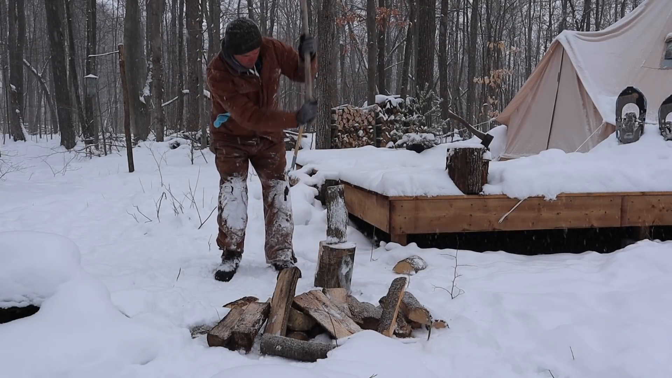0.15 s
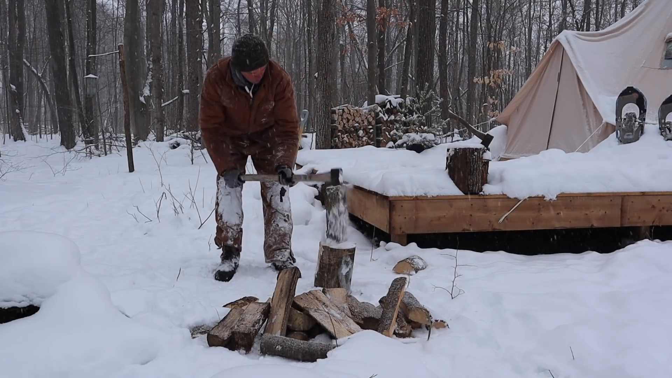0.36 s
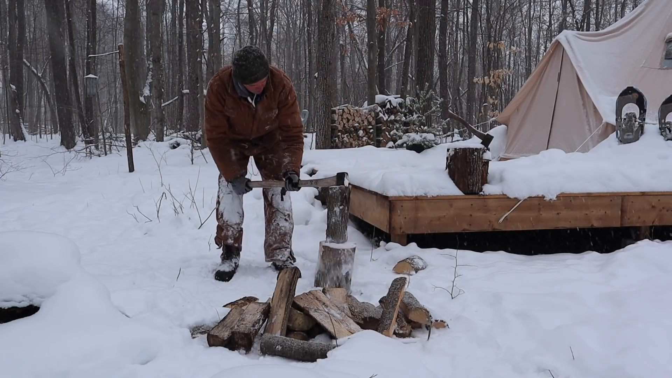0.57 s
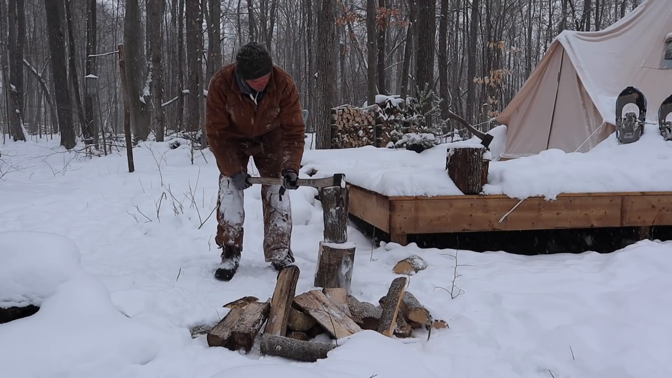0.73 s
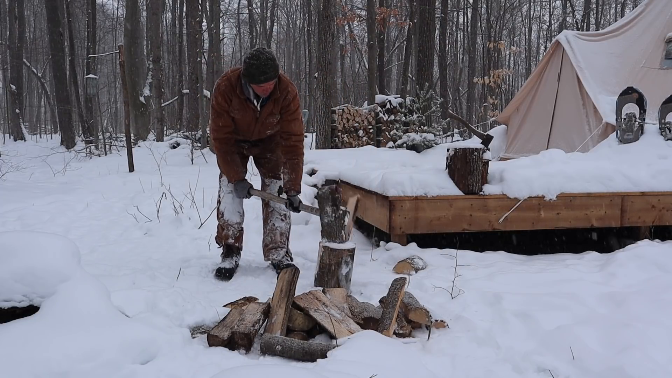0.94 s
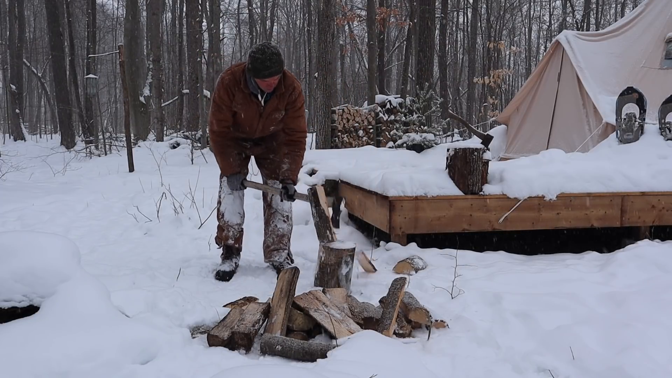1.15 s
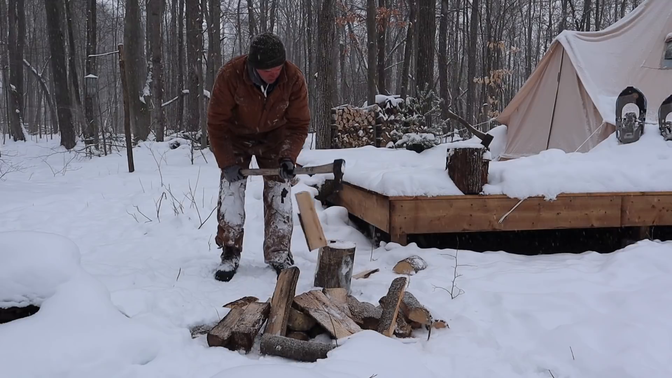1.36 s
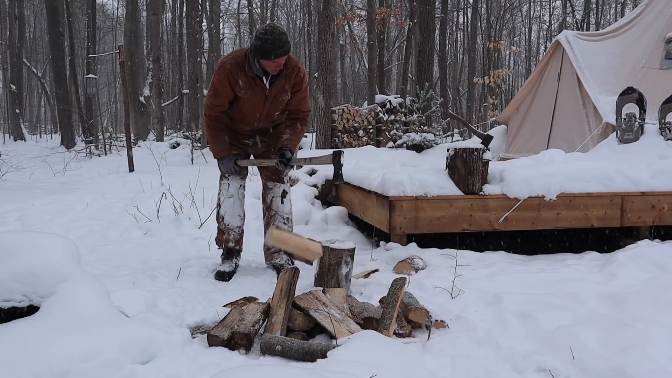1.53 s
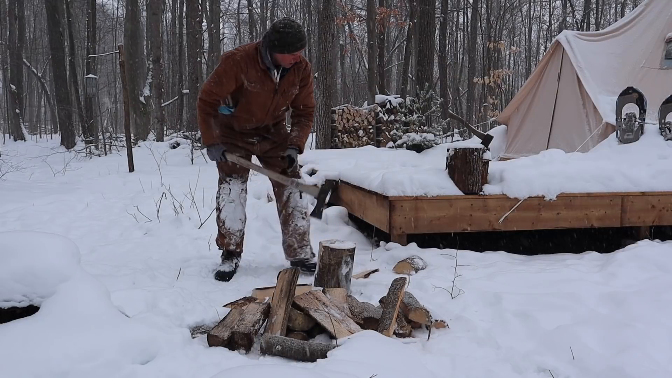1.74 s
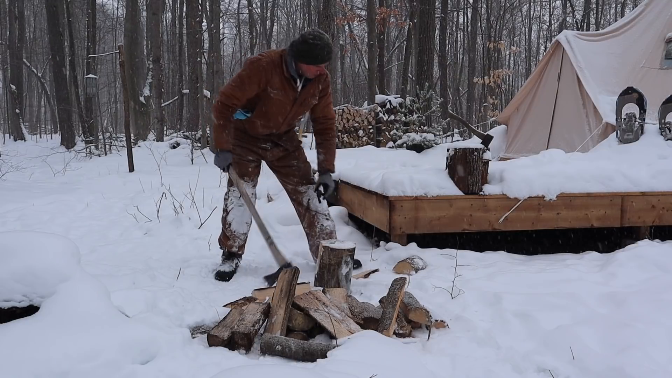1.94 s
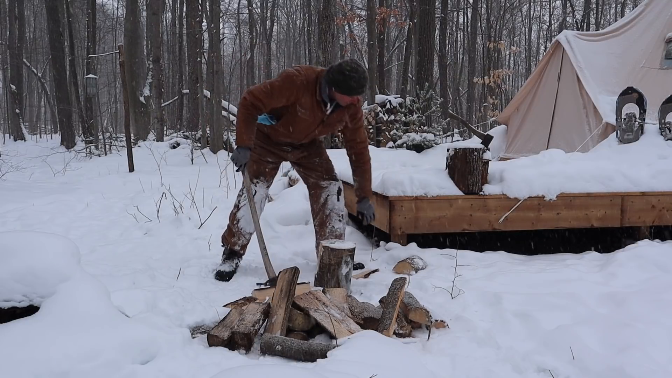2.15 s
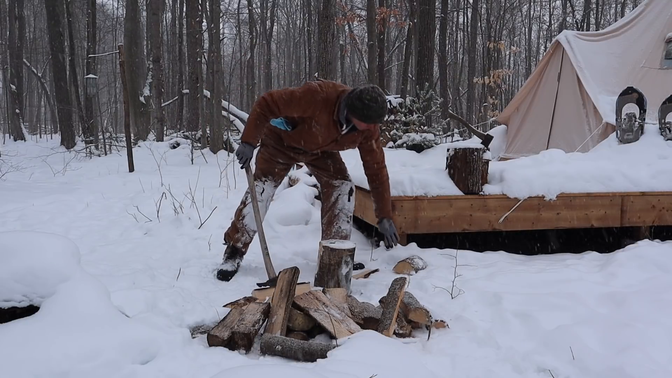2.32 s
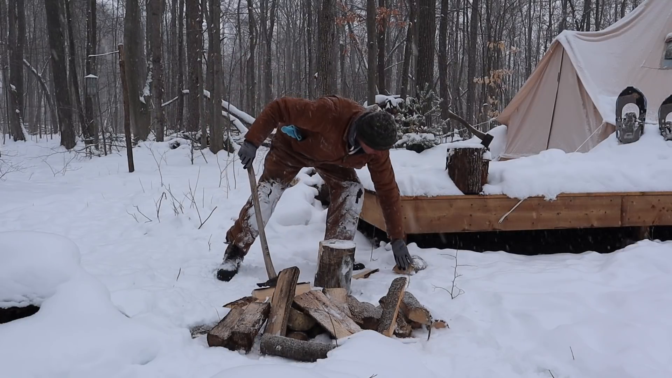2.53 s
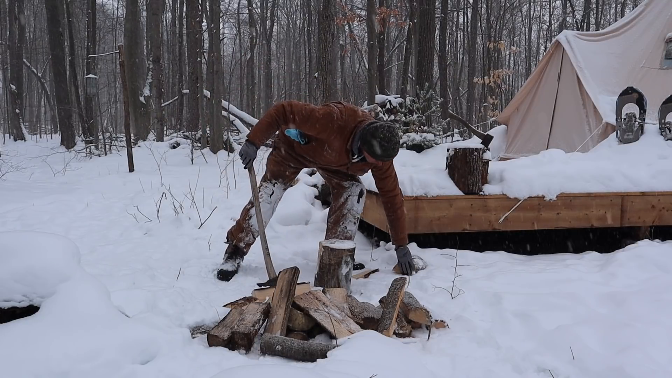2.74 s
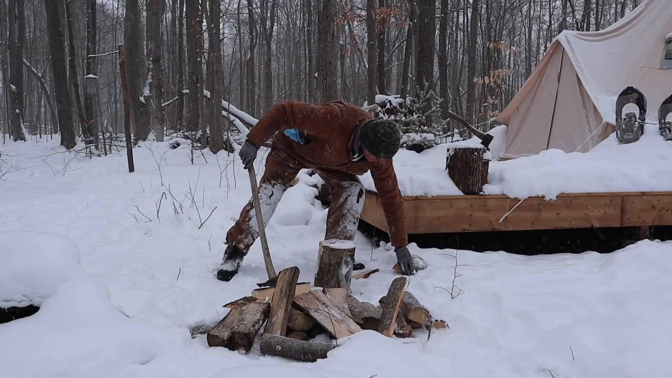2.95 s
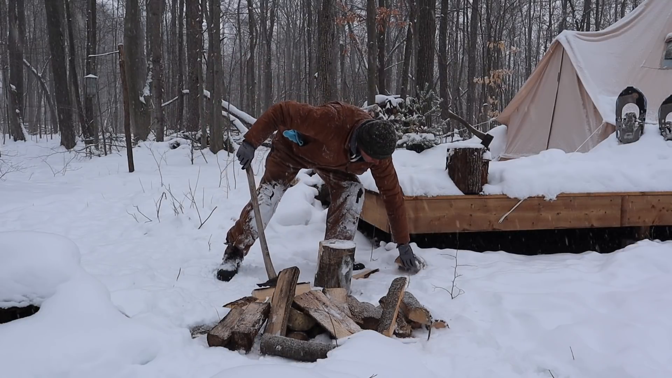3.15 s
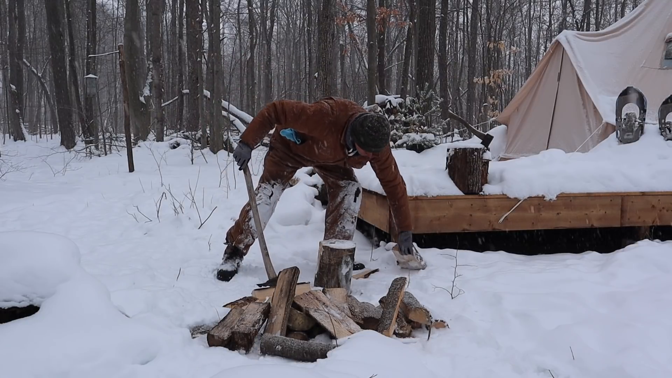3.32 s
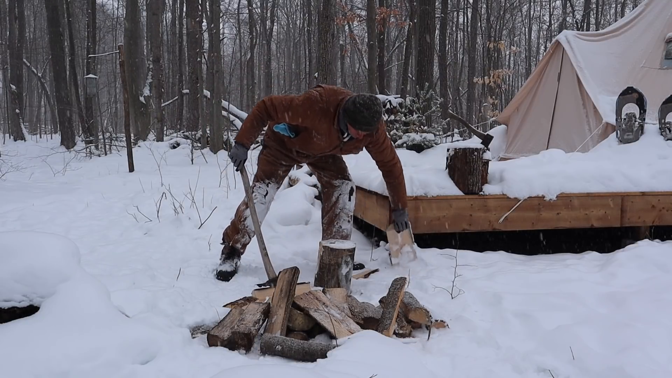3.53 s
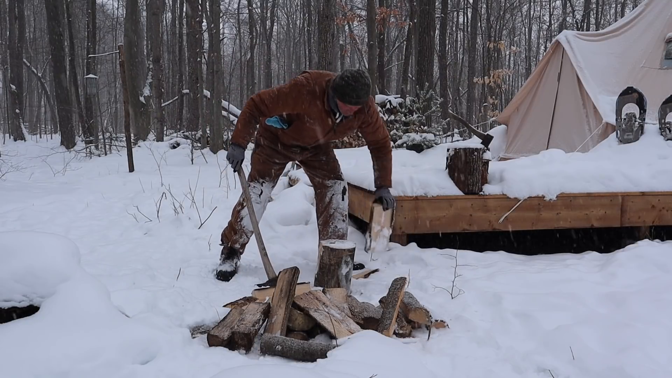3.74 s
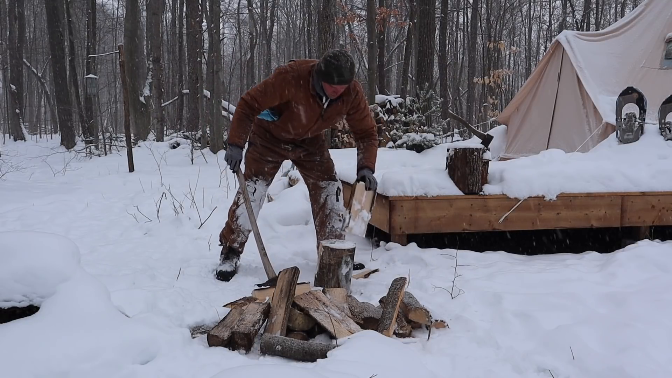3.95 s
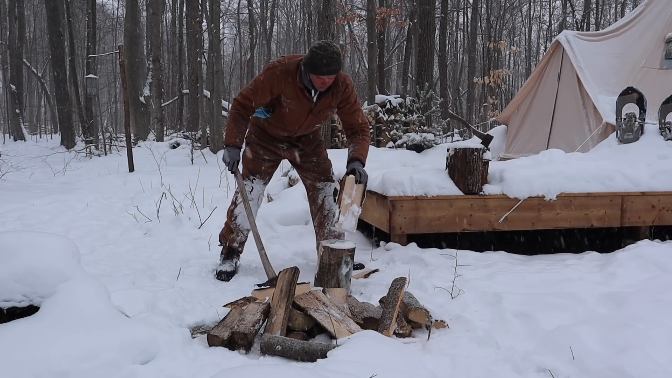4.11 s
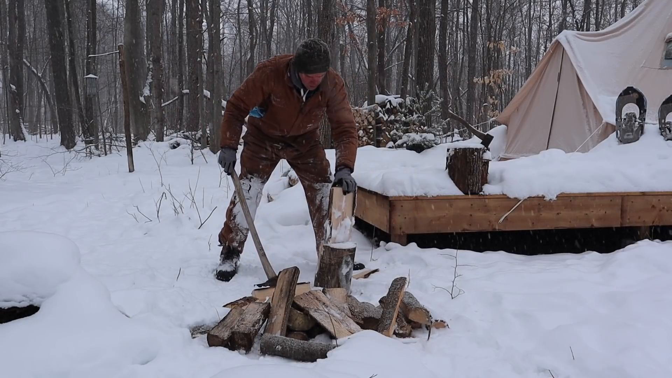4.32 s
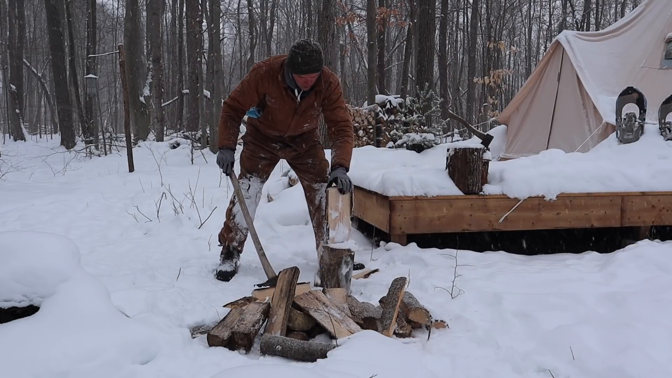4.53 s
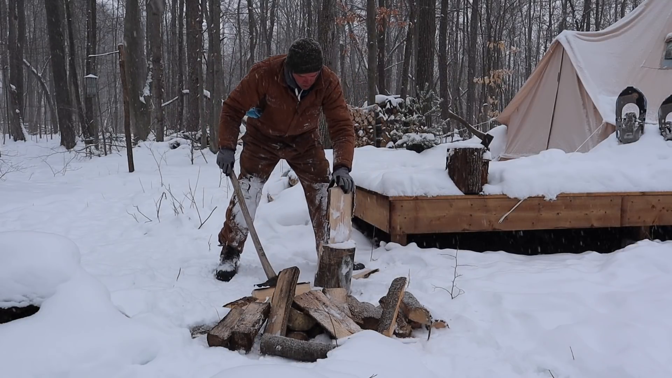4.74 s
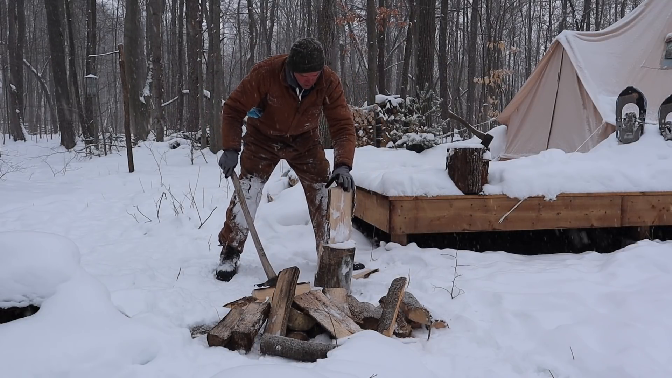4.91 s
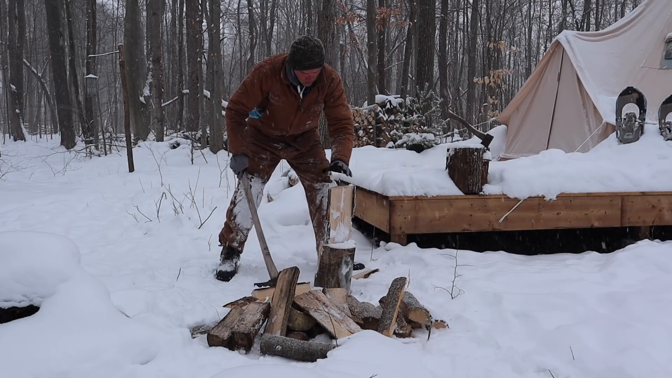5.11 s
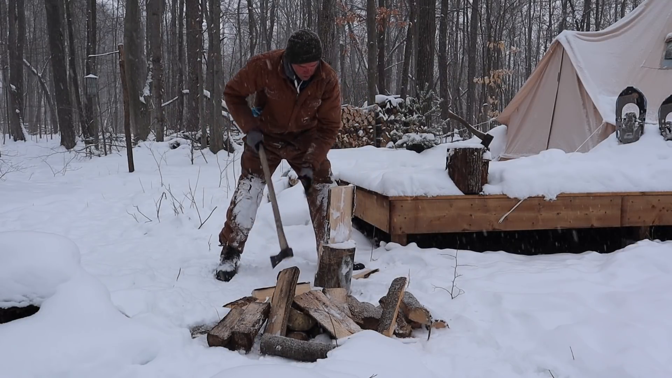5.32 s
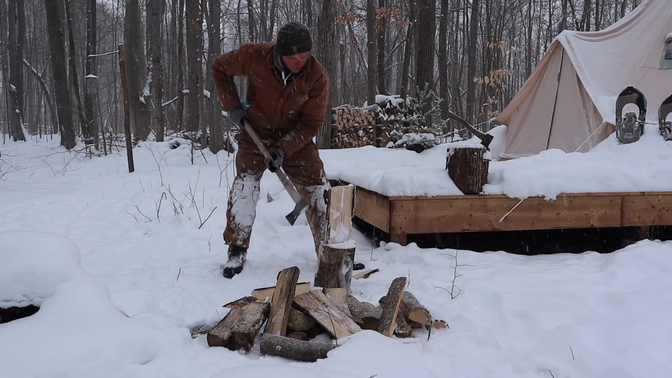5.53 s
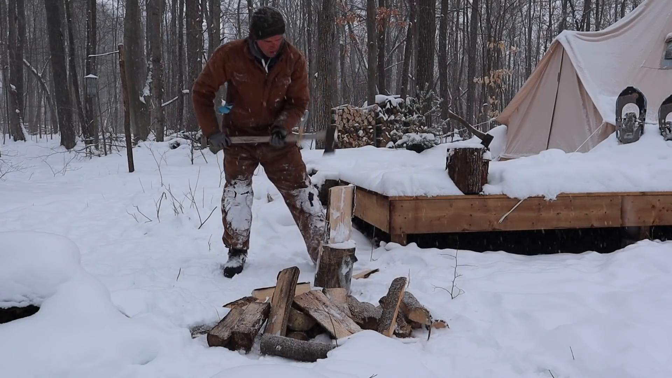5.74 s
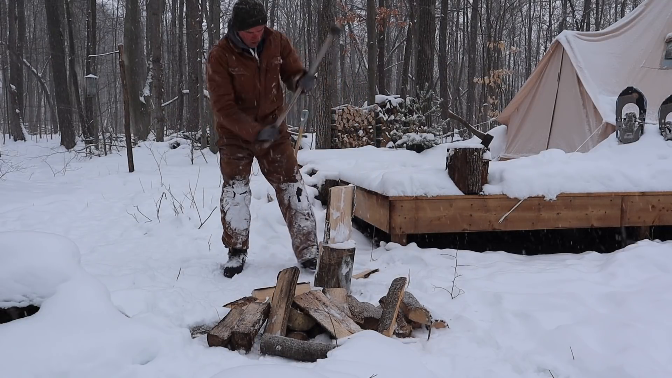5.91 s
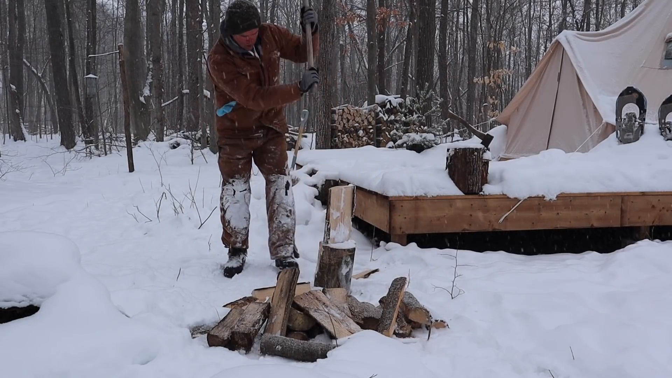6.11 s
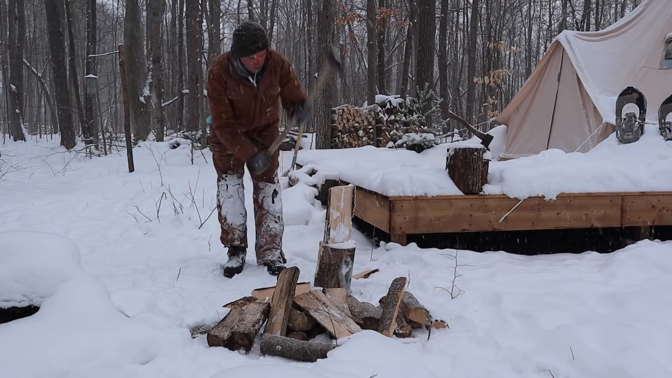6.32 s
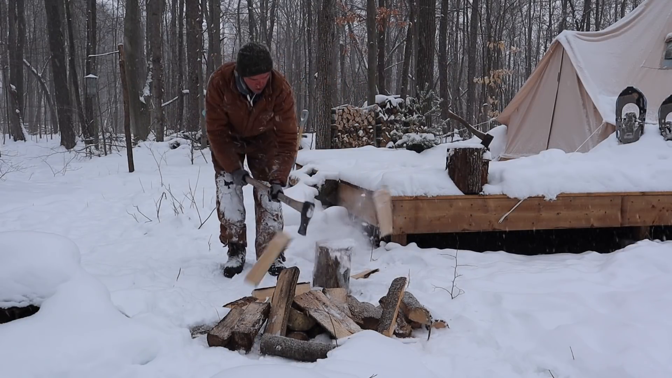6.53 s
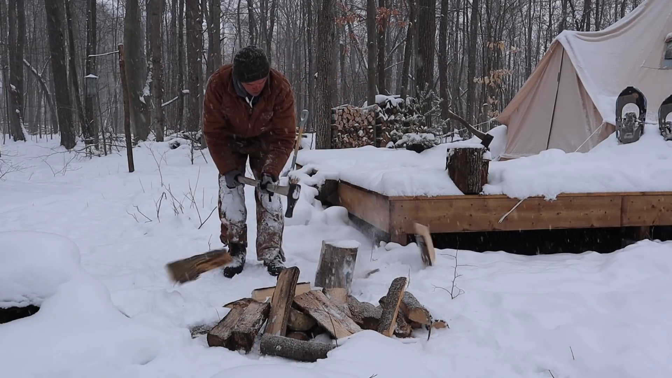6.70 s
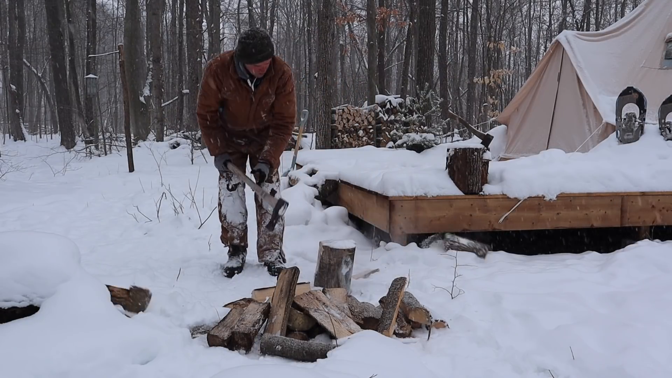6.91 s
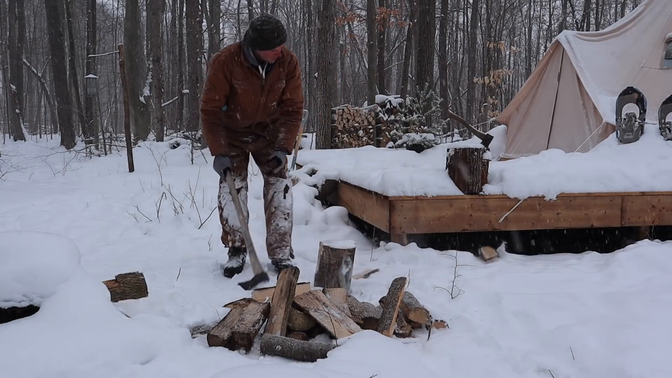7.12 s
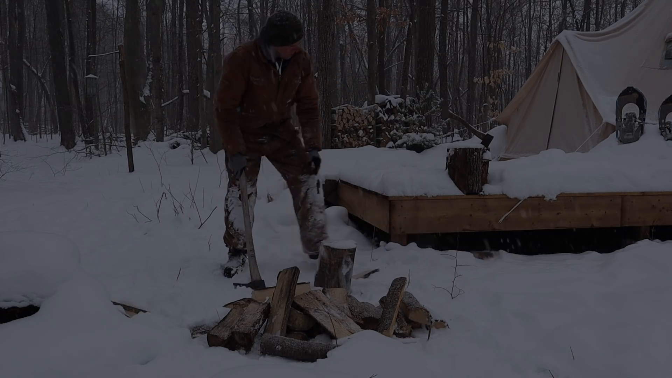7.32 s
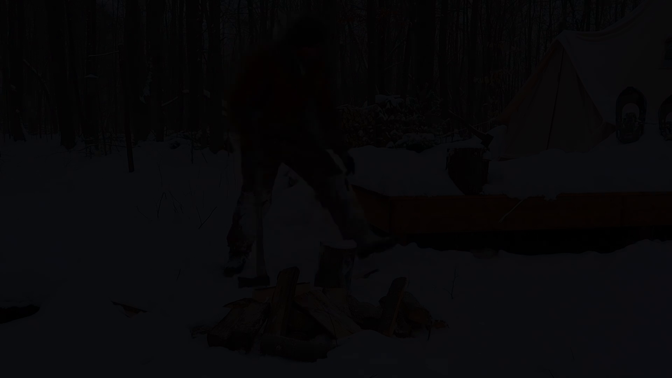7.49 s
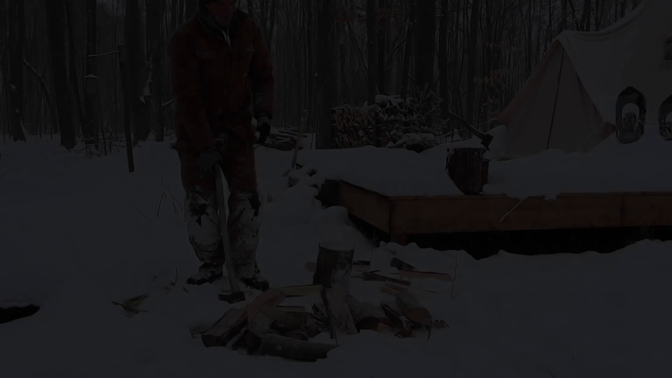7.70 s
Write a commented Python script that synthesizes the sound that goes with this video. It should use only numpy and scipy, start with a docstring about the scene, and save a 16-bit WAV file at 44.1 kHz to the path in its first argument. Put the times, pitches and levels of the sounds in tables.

```python
"""An axe splits a log on a chopping block in a snowy wood, a few metres from the microphone.
Wind and hiss, a random field, lie under granular rustle of clothes and snow; a bite of breaking fibres
comes early and its late echo returns from the trunks. Fibre snaps tear the log apart; pieces knock, as
ringing modes, on block, deck and pile. Thin rising chirps, steely rubs and faint high whines come and go;
after a quieter stretch a second blow brings a run of hard knocks, and the last pieces settle."""
import sys
import numpy as np
from scipy import signal
from scipy.io import wavfile
from scipy.ndimage import uniform_filter1d

SR = 44100
rng = np.random.default_rng(int(sys.argv[2]) if len(sys.argv) > 2 else 0)


def store_wav(level_fs):
    """Save 16-bit WAV to argv[1]."""
    pcm = np.round(np.clip(np.atleast_2d(level_fs), -1, 1) * 32767)
    wavfile.write(sys.argv[1], SR, pcm.T.astype(np.int16))


N = 346626
FIFTH = np.arange(SR // 5) / SR  # a fifth of a second [s], long enough for any knock

# a struck billet: (multiple of its pitch, level [dB], share of its t60)
BILLET = [(.33, -9, 0.68), (.62, -7, 0.68), (0.999, 1, 1), (1.241, -12.5, .6), (1.42, -6.5, .7),
          (1.851, -8, .6), (2.4, -10, .6), (2.95, -19.5, .5)]
# deck, pile and large pieces: (multiple of the hollow pitch, level [dB], t60 before the ring factor [s])
HOLLOW = [(.75, -6, 0.049), (1, -7, 0.083), (1.2, -8, .06), (1.47, -6.5, .05), (1.85, -8, .05),
          (2.1, -9.5, .05)]
# the block on frozen soil: (frequency [Hz], level [dB], t60 before any shortening [s])
BLOCK = [(78, 3.5, .08), (104.6, 8.5, 0.12), (140, 2, .045)]
# fibres breaking: (frequency [Hz], level [dB])
SNAP = [(1470, -32.5), (2500, -7.5), (3710, -2.5), (5770, -7.5), (7980, -5), (9050, -15), (14400, -18.5),
        (15900, -23), (16500, -42)]


def gain_of(db):
    """Decibels to gain."""
    return 10 ** (np.asarray(db) / 20)


def evened(x):
    """Scales to rms 1."""
    return x / np.sqrt(np.mean(x ** 2) + 1e-20)


def peaked(x):
    """Scales to peak 1."""
    return x / (abs(x).max() + 1e-20)


def read(points, hz):
    """Straight lines on a log-frequency axis."""
    f, value = np.transpose(points)
    return np.interp(np.log(hz + 1), np.log(f + 1), value)


def add(mix, s, sound):
    """Mixes a sound in at second s."""
    part = mix[round(s * SR):][:len(sound)]
    part += sound[:len(part)]


def above(x, hz):
    """High-pass."""
    return signal.sosfilt(signal.butter(2, hz, "high", fs=SR, output="sos"), x)


def causal(points):
    """Minimum-phase response with the given spectrum, floored at -90 dB."""
    level_db = read(points, abs(np.fft.fftfreq(4096, 1 / SR)))
    log_gain = np.log(gain_of(np.maximum(level_db, -90)))
    return np.fft.ifft(np.exp(np.conj(signal.hilbert(log_gain)))).real[:1024]


def ring(modes, pitch=1, lasting=1):
    """Sum of dying sines; pitch scales their frequencies, lasting their t60s."""
    sound = np.zeros(len(FIFTH))
    for f, db, t60 in modes:
        decay = gain_of(db - 60 * FIFTH / (t60 * lasting))
        sound += decay * np.sin(2 * np.pi * f * pitch * FIFTH)
    return sound


def singing(peaks):
    """Response of resonances given by their widths: the narrower, the longer they ring."""
    return ring([(f, db + 10 * np.log10(width), 2.2 / width) for f, width, db in peaks])


def grains(count, per_s, spread_db):
    """Sparse clicks of random sign, a few of them large."""
    chance, size = rng.random(count), rng.exponential(1, count)
    sign = rng.choice([-1., 1.], count)
    return (chance < per_s / SR) * sign * gain_of(spread_db * np.minimum(size, 4))


def coloured(x, response):
    """Filters x and brings it to rms 1."""
    return evened(signal.oaconvolve(x, response)[:len(x)])


def swell(top, rise, fall, hold=0):
    """Times around a top, and a level in dB that climbs to it, holds and falls in straight lines."""
    t = top + np.arange(-SR // 4, SR // 3) / SR
    t = t[t >= 0]
    return t, -20 * np.maximum((top - t) / rise, np.maximum(t - top - hold, 0) / fall)


def chatter(contact):
    """A contact force: a first touch followed by smaller, uneven ones."""
    touches = grains(len(FIFTH), 8200, 2.7) + 4 * (FIFTH == 0)
    return touches * np.exp(-FIFTH / max(contact, 2e-4))


def rung(db, force, body):
    """A force through a body, at a given peak level."""
    return gain_of(db) * peaked(signal.fftconvolve(force, body)[:len(force)])


def air():
    """Wind in bare trees and microphone hiss: random short-time spectra with faint drifting patches."""
    # wind and hiss: (frequency [Hz], level [dB])
    air_colour = [(12, -44.5), (20, -18.5), (65, -3), (195, -7), (224, -5.5), (289, -7.5), (382, -4.5),
                  (440, -14), (521, -10), (816, -13.5), (1280, -15.5), (15200, -24.5), (16500, -33.5)]
    # slow changes: (time [s], level [dB])
    air_level = [(0, 1), (2, 2), (3, -0.1), (5, 0.4), (6.4, 1.7), (7.1, 2.1), (7.45, -2.5), (7.7, -4.5),
                 (7.86, -5.5)]
    air_db = -56.5  # rms before the slow changes
    frames, hz = N // 256 + 5, np.fft.rfftfreq(1024, 1 / SR)
    a, b, patches = rng.standard_normal((frames, 513, 3)).T
    patches = uniform_filter1d(patches, 12, 0)  # across frequency
    patches = evened(uniform_filter1d(patches, 14, 1))  # along time
    spectra = (a + 1j * b) * gain_of(read(air_colour, hz)[:, None] + .8 * patches)
    noise = evened(signal.istft(spectra, nperseg=1024, noverlap=768)[1][:N])
    level_db = np.interp(np.arange(N) / SR, *np.transpose(air_level))
    return gain_of(air_db + level_db) * noise


def move():
    """Cloth swishes in soft grains, snow crunches in finer, sharper ones, over a low, wandering fidget."""
    # sleeves, boots and snow as the chopper moves: (peak time [s], rise [s per 20 dB],
    # fall [s per 20 dB], swish level [dB], crunch level [dB])
    moves = [(.002, .011, .05, -38, -43), (.146, .14, .07, -46, -56), (.338, .1, .021, -51, -62),
             (.41, .03, .011, -43, -56), (1.042, .011, .09, -41, -46), (1.125, .021, .05, -52, -60),
             (1.24, .03, .07, -52, -54), (1.37, .05, .15, -60, -66), (1.602, .015, .05, -54, -64),
             (1.75, .15, .15, -58, -56), (1.95, .15, .11, -60, -59), (2.09, .05, .09, -50, -48),
             (2.21, .015, .05, -55, -62), (2.41, .09, .09, -60, -66), (3.26, .11, .04, -64, -63),
             (3.46, .2, .15, -64, -54), (3.925, .011, .03, -54, -68), (4.41, .021, .09, -52, -53),
             (5.08, .09, .05, -70, -60), (5.168, .03, .05, -60, -65), (5.374, .05, .06, -59, -57),
             (5.53, .05, .04, -54, -58), (5.6, .07, .03, -49, -49), (5.73, .06, .06, -49, -60),
             (5.91, .05, .05, -52, -60), (6.04, .13, .11, -45, -56), (6.16, .09, .13, -50, -60),
             (6.37, .021, .11, -52, -53), (6.66, .011, .15, -43, -52), (6.82, .021, .021, -40, -46),
             (6.99, .011, .15, -49, -58), (7.034, .021, .021, -61, -53), (7.15, .06, .06, -56, -59),
             (7.32, .04, .15, -57, -56), (7.61, .015, .05, -58, -58), (7.755, .03, .03, -47, -58)]
    # cloth: (frequency [Hz], level [dB])
    cloth_colour = [(71, -44.5), (120, -9), (366, -9.5), (430, -1), (491, -5.5), (936, -11), (1500, -13.5),
                    (4000, -25.5), (5200, -42), (8800, -120)]
    # snow: (frequency [Hz], level [dB])
    snow_colour = [(710, -29.5), (1200, -11), (2510, -8.5), (2790, -10), (5780, -10.5), (7570, -5),
                   (9720, -14), (12100, -18.5), (16000, -22)]
    fidget_swish_db, fidget_crunch_db, wander_db = -68, -71, 2.5
    wander = gain_of(wander_db * evened(uniform_filter1d(rng.standard_normal(N), 4000)))
    swish, crunch = gain_of(fidget_swish_db) * wander, gain_of(fidget_crunch_db) * wander
    for peak, rise, fall, swish_db, crunch_db in moves:
        t, shape_db = swell(peak, rise, fall)
        add(swish, t[0], gain_of(swish_db + shape_db))
        add(crunch, t[0], gain_of(crunch_db + shape_db))
    cloth = coloured(grains(N, 1500, 1.7), causal(cloth_colour))
    snow = coloured(grains(N, 4000, 2.6), causal(snow_colour))
    return swish * cloth + crunch * snow


def soil(db):
    """The frozen ground answers a shock with a slow, late boom."""
    return gain_of(db) * np.sin(np.pi * FIFTH / FIFTH[-1]) ** 2 * np.sin(2 * np.pi * 52 * FIFTH)


def hit(contact, knock_db, hz, t60_s, tilt_db, snap_db, hollow_db, hollow_hz, hollow_lasting, thud_db):
    """An uneven contact force rings the billet, the hollow under it and the block."""
    ground_db, ground_share = -42, .55  # the ground booms at ground_db plus this share of the thud's dB
    force = chatter(contact)
    push = np.exp(-((FIFTH - .0012) / 0.00056) ** 2)  # the slow part of the force moves the heavy bodies
    billet = [(k, db + tilt_db * np.log2(k), t60) for k, db, t60 in BILLET]
    sound = rung(knock_db, force, above(ring(billet, hz, t60_s), .25 * hz))
    sound += rung(snap_db, force, causal(SNAP))
    hollow = above(ring(HOLLOW, hollow_hz, hollow_lasting), 0.39 * hollow_hz)
    sound += rung(hollow_db, push + 0.027 * force, hollow)
    sound += rung(thud_db, push, above(ring(BLOCK), 55))
    return sound + soil(ground_db + ground_share * thud_db)


def blow(db, tilt_db, ground_db, contact, shock_db, log_db, log_hz, t60_s, thud_db):
    """A dense burst of breaking fibres while the edge travels, brightest at first touch."""
    # the edge parting the fibres: (frequency [Hz], level before the brightness tilt [dB])
    bite = [(88, -42.5), (150, -2.5), (409, -17), (1120, 0.5), (1790, -2), (2400, -15), (6050, -18),
            (7810, -19), (11100, -29), (14700, -23.5), (16500, -39.5)]
    colour = causal([(f, d + tilt_db * np.log2(f / 1000)) for f, d in bite])
    burst = coloured(grains(len(FIFTH), 15000, 3.14), colour)
    treble = above(burst, 3600)
    sound = (burst - treble) * np.exp(-(FIFTH / contact) ** 3)
    sound += treble * (np.exp(-(FIFTH / (.5 * contact)) ** 2) + 0.11 * np.exp(-FIFTH / 0.0035))
    log = rung(log_db, chatter(0.0018), above(ring(BILLET, log_hz, t60_s), 540))  # the log rings briefly
    log += gain_of(thud_db) * peaked(above(ring(BLOCK, 1, .45), 55))  # and drives the block
    shock = gain_of(shock_db) * peaked(colour)  # what goes out to the trunks
    return gain_of(db) * peaked(sound) + log + soil(ground_db), shock


def tear(t, body_db, fizz_db, hollow_db):
    """Clumped fibre snaps excite the log's body, its bright fizz and the hollow below."""
    # body of the tearing log: (frequency [Hz], width [Hz], level [dB])
    grain = [(760, 330, -4), (1270, 270, -2), (1800, 480, 1.5), (2300, 400, -9), (3050, 170, -4.5)]
    clumps = gain_of(2.6 * evened(uniform_filter1d(rng.standard_normal(len(t)), 120)))
    snaps = grains(len(t), 7000, 1.9) * clumps
    sound = coloured(snaps, above(singing(grain), 370))
    sound += gain_of(fizz_db) * coloured(snaps, causal(SNAP))
    sound += gain_of(hollow_db) * coloured(snaps, above(ring(HOLLOW, 420, 0.65), 200))
    soft_ends = np.minimum(1, np.minimum(t - t[0], t[-1] - t) / 0.0013)
    return t[0], gain_of(body_db) * sound * soft_ends


def after_blow(s, db):
    """The log goes on tearing behind the edge, ever more slowly."""
    delay_s, settle_s, settle_db = .0045, .004, 38  # dies by settle_db per tenfold time
    t = np.arange(SR // 20) / SR
    level_db = db - settle_db * np.log10(1 + t / settle_s)
    return tear(s + delay_s + t, level_db, fizz_db=1.5, hollow_db=-18)


def crack(db, hz, snap_db):
    """A splinter is one broad resonance under a bright snap."""
    contact_s, width_hz = .0017, 480
    force = chatter(contact_s)
    sound = rung(db, force, above(singing([(hz, width_hz, 0)]), .5 * hz))
    return sound + rung(snap_db, force, causal(SNAP))


def trunks(x):
    """Scattered returns from the wood: weaker ones first, then stronger ones after about 75 ms."""
    # what the trunks return: (frequency [Hz], level [dB])
    echo_colour = [(150, -18.5), (500, -4.5), (900, -2.5), (1250, -6.5), (1700, -7), (2500, -5),
                   (6000, -4.5), (10000, -7.5), (16000, -15.5)]
    # how long it lasts: (frequency [Hz], t60 [s])
    echo_t60 = [(200, .9), (800, 0.7), (1400, 1.1), (3000, 1.3), (7000, .6), (15000, 0.87)]
    t = np.arange(SR) / SR
    weight = (1.2 + 1 / (1 + np.exp(-(t - .075) / .006))) * (t > .02)
    taps = grains(SR, 2500, 0.55) * weight
    hz, frame, z = signal.stft(taps, SR, nperseg=256)
    z = z * gain_of(read(echo_colour, hz)[:, None] - 60 * frame / read(echo_t60, hz)[:, None])
    tail = signal.istft(z, SR, nperseg=256)[1]
    return signal.fftconvolve(x, tail / np.linalg.norm(tail))[:N]


def split():
    """One long tear as the log is prised apart and the halves come away."""
    # course of the tear: (time [s], body level [dB], fizz relative [dB], hollow relative [dB])
    split_course = [(.85, -53, -2.5, -6), (.876, -32, -6, -14), (.93, -29, -1.1, -8), (.954, -21, -4, -3),
                    (.972, -23.5, .4, -14), (.996, -26, -9, 3), (1.006, -24, -14, 4), (1.014, -40, -8, 6),
                    (1.045, -44, -8, -15)]
    s, *columns = np.transpose(split_course)
    t = s[0] + FIFTH
    return tear(t, *(np.interp(t, s, c) for c in columns))


def chirp(db):
    """A sine that climbs for 14 ms while it fades."""
    start_hz, fade_s = 6800, .004
    t = np.arange(0, .014, 1 / SR)
    turns = np.cumsum(start_hz * (1 + 0.45 * (t / t[-1]) ** 0.83)) / SR
    shape = np.sqrt(abs(np.sin(np.pi * t / t[-1]))) * np.exp(-t / fade_s)
    return gain_of(db) * peaked(np.sin(2 * np.pi * turns) * shape)


def scrape(top, rise, fall, hold, db, fizz_db, hollow_db):
    """A piece scrapes: a short tear that swells and fades."""
    t, shape_db = swell(top, rise, fall, hold)
    return tear(t, db + shape_db, fizz_db, hollow_db)


def steely(top, rise, fall, hold, db, tilt_db):
    """Random clicks keep narrow high resonances singing: a bright, steely rub or a faint whine."""
    # steely resonances: (frequency [Hz], width [Hz], level before the tilt [dB])
    steel_modes = [(4780, 91, 2.5), (6136, 41, 5.5), (8700, 14, -3.5), (12100, 75, -10.5),
                   (14400, 50.7, -23)]
    t, shape_db = swell(top, rise, fall, hold)
    tilted = [(f, width, d + tilt_db * np.log2(f / 8000)) for f, width, d in steel_modes]
    steel = coloured(grains(len(t), 1400, 6.3), above(singing(tilted), 3000))
    return t[0], gain_of(db + shape_db) * steel


def scene():
    """Everything near the block shares the echo of the wood; the shock of each axe blow carries farthest."""
    # wood knocks on wood: (time [s], contact [s], knock peak [dB], knock pitch [Hz], knock t60 [s],
    # brightness [dB per octave], snap [dB], hollow [dB], hollow pitch [Hz], hollow ring factor, thud [dB])
    hits = [ (.337, .0023, -49.5, 1650, .02, 1.1, -62, -38, 369, .77, -55),
            (.9938, .0012, -3, 1080, .012, -1.1, -30, -18, 361, .99, -19),
            (1.004, .003, -11, 1280, .017, -3, -40, -7, 380, .5, -17),
            (1.2332, .003, -25, 2920, .04, -5, -21, -33, 245, .76, -41),
            (1.2553, .0015, -38, 2950, .03, -1.1, -48, -56, 369, .9, -55),
            (1.3617, .0025, -54, 1770, .015, -3, -58, -44, 313, .9, -54),
            (1.373, .0025, -54, 1440, .015, -3, -59, -35, 245, .8, -55),
            (1.4272, .0025, -56, 1340, .015, -3, -38, -35, 285, .62, -53),
            (1.599, .0028, -56, 1480, .02, -5, -60, -44, 283, .9, -49),
            (1.7352, .0015, -23, 1570, .018, -3, -45, -30, 330, .9, -32),
            (1.7502, .004, -32, 2220, .011, -8, -50, -42, 233, .9, -32),
            (2.0708, .0035, -23, 1257, .065, 1.5, -31, -38, 363, .8, -45),
            (2.48, .003, -40, 1390, .025, -3, -45, -42, 332, 1.1, -47),
            (3.9186, .0024, -49, 1296, .02, -4, -64, -42, 228, 1.1, -43),
            (4.3788, .0018, -17, 1270, .011, 2.1, -40, -18, 240, .66, -26),
            (4.3819, .002, -29, 1494, .055, .6, -49, -26, 390, .74, -33),
            (5.444, .0017, -52, 1100, .015, -1.1, -64, -33, 304, .75, -54),
            (5.6093, .0025, -37, 1820, .013, .1, -55, -45, 254, .7, -54),
            (5.6664, .0025, -45, 1270, .02, 2.1, -57, -37, 231, .9, -46),
            (5.722, .0025, -50, 1200, .015, -3, -60, -42, 240, .7, -55),
            (5.7492, .0022, -42, 1200, .02, -3, -51, -38, 268, .65, -55),
            (5.792, .0015, -33, 1190, .012, 2.1, -54, -34, 400, .53, -46),
            (5.847, .002, -33, 1090, .012, -1.1, -50, -33, 430, .6, -52),
            (5.987, .002, -42, 1350, .02, -3, -60, -43, 380, .6, -58),
            (6.5254, .0025, -19, 1850, .015, 1.5, -22, -15, 280, .8, -24),
            (6.5283, .003, -24, 1110, .015, 3, -36, -14, 400, .6, -16),
            (6.6429, .005, -16, 1670, .011, -9, -16, -15, 260, .58, -46),
            (6.6495, .0025, -21, 1910, .018, -9, -21, -17, 376, .48, -32),
            (6.8105, .0037, -17, 3100, .014, -5, -13, -22, 237, .76, -23),
            (6.8924, .0023, -3, 1200, .014, -3, -12, -7, 420, .42, -48),
            (6.8951, .004, -7, 1675, .02, -4, -11, -3, 370, .65, -26),
            (6.8981, .002, -7, 1060, .025, -1.1, -38, -8, 345, 2.3, -36),
            (6.974, .002, -19, 1060, .009, 4, -43, -7.5, 316, .45, -35),
            (7.232, .003, -50, 1500, .015, .1, -55, -42, 420, .8, -42),
            (7.275, .003, -55, 1500, .015, .1, -60, -48, 240, .8, -44),
            (7.602, .003, -40, 1920, .025, 3, -58, -48, 269, .9, -48),
            (7.707, .0029, -47, 1630, .02, -3, -49, -42, 364, .7, -64),
            (7.726, .0022, -44, 2300, .02, 2.1, -49, -57, 231, .9, -60),
            (7.7463, .002, -31, 1150, .015, -3, -46, -33, 240, 1.3, -58), ]
    # the axe bites: (time [s], peak [dB], brightness [dB per octave], ground [dB], contact [s],
    # shock sent into the wood [dB], log [dB], log pitch [Hz], log t60 [s], thud [dB], tearing [dB])
    blows = [(0.4213, 6.5, 1.16, -52, 0.003, -6.5, 1.1, 1270, 0.024, -35, -9),
             (6.4714, 8, 1.7, -39, 0.0042, -11, .1, 1183, 0.025, -30, -12)]
    # single fibres and splinters crack: (time [s], peak [dB], centre [Hz], snap [dB])
    cracks = [(.4295, -10, 1600, -22), (.4335, -11, 1740, -24), (.4372, -3, 1200, -16),
              (.4438, -13, 1310, -24), (.449, -20, 1400, -30), (.7243, -31, 3100, -29),
              (.8395, -30, 1330, -26), (.8899, -18.5, 1630, -8.5), (.9025, -25, 1270, -23),
              (.9211, -19, 970, -16), (.9424, -18, 1290, -28), (.9464, -17, 1020, -27),
              (.954, -9, 4520, -23), (.9578, -16, 1250, -18), (.9662, -11, 1270, -28),
              (.9784, -10, 1360, -26), (.9864, -14, 1500, -33), (1.0814, -41, 1600, -33),
              (1.157, -32.5, 2280, -46), (1.1768, -30, 3360, -35), (1.1924, -51, 1310, -43),
              (1.3281, -27.5, 3740, -50), (1.3314, -32, 4700, -50), (3.2662, -36, 4900, -58),
              (4.5096, -47, 3010, -44), (5.3666, -38, 1392, -42), (6.5864, -31, 1074, -27),
              (6.5995, -37, 1498, -25), (6.7754, -41, 950, -41), (6.9384, -38, 1050, -50),
              (7.31, -43, 5600, -51), (7.3253, -44, 946, -49), (7.399, -47.5, 980, -39.5)]
    # thin rising chirps, perhaps a small bird: (time [s], peak [dB])
    chirps = [(1.7174, -49), (5.0235, -53.5), (5.1916, -53), (5.6356, -52), (5.691, -46.5), (5.7598, -51),
              (6.0724, -47.5), (6.1774, -49.5), (6.2257, -47.5), (6.292, -43), (6.355, -42)]
    # pieces scrape: (top time [s], rise [s per 20 dB], fall [s per 20 dB], hold [s], body level [dB],
    # fizz relative [dB], hollow relative [dB])
    scrapes = [(1.74, .004, .022, .024, -38, -2.5, -6), (2.07, .025, .025, .008, -36, -3, -12),
               (3.44, .11, .07, .05, -56, -6, -20), (6.53, .011, .04, .004, -35, .3, 8),
               (6.56, .04, .05, .05, -44, 1.5, -12), (6.64, .003, .011, .012, -38, 5, -6),
               (6.851, .006, .03, .018, -39, 3, -22), (7.136, .025, .06, .003, -57, 3, -12),
               (7.21, .008, .025, .033, -42, .3, -8), (7.656, .003, .015, .012, -54, 7, -15)]
    # bright, steely rubs, and faint high tonal whines at 5.25 and 7.47 s: (top time [s],
    # rise [s per 20 dB], fall [s per 20 dB], hold [s], level [dB], tilt [dB per octave])
    rubs_and_whines = [(2.068, .013, .025, .003, -35, 5), (5.25, .15, .05, .05, -59, .1),
                       (6.48, .005, .06, .045, -50, 25), (7.204, .004, .03, .035, -41, 3),
                       (7.47, .08, .05, .11, -68, 8)]
    near, shocks = np.zeros(N), np.zeros(N)
    for s, *row in hits:
        add(near, s, hit(*row))
    for s, *_, tear_db in blows:
        add(near, *after_blow(s, tear_db))
    for s, *row in cracks:
        add(near, s, crack(*row))
    add(near, *split())
    for s, db in chirps:
        add(near, s, chirp(db))
    for row in scrapes:
        add(near, *scrape(*row))
    for row in rubs_and_whines:
        add(near, *steely(*row))
    small = near.copy()  # all but the bites, which reach the trunks as shocks
    for s, *row, _ in blows:
        sound, shock = blow(*row)
        add(near, s, sound)
        add(shocks, s, shock)
    echo = trunks(shocks + gain_of(-33) * small)
    return (near + move() + echo + air())[None]


def record(dry):
    """The loudest blows clip; then a low-pass sets the band limit."""
    edge_hz = 16600
    clipped = np.clip(dry, -1, 1)
    lowpass = signal.firwin(511, edge_hz, window=("kaiser", 9), fs=SR)
    limited = signal.oaconvolve(clipped, lowpass[None], "same")
    return np.clip(limited, -1, 1)


dry = scene()
out = record(dry)
store_wav(out)
```